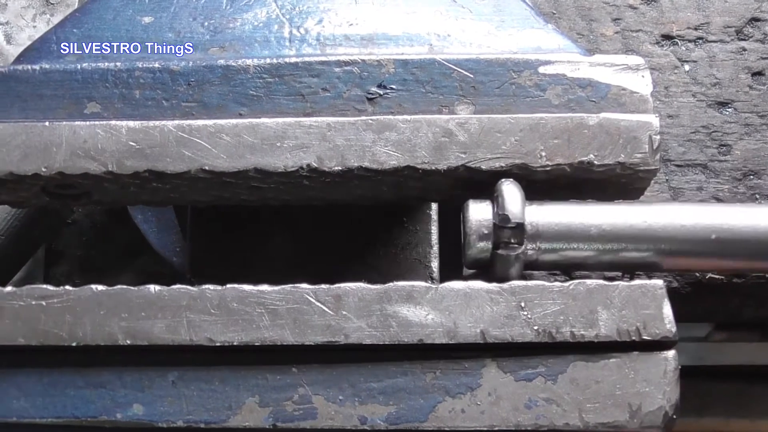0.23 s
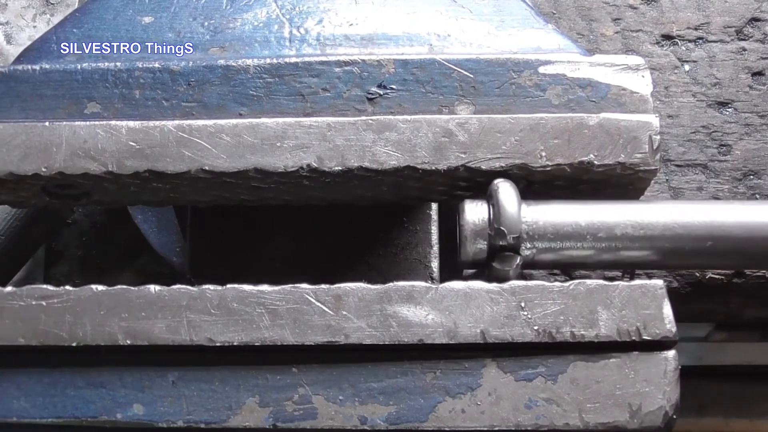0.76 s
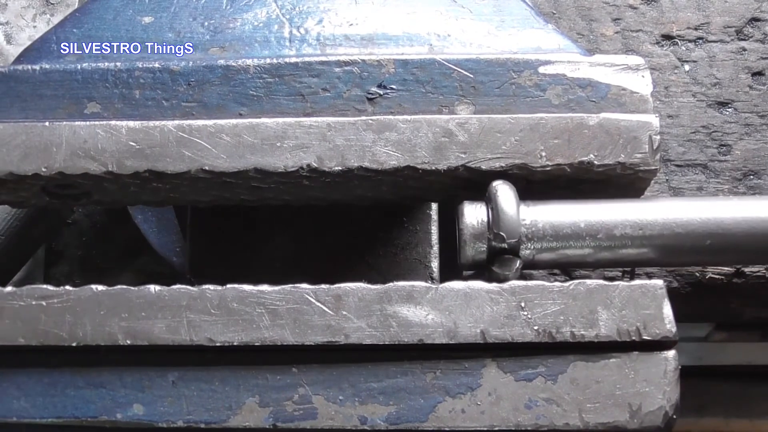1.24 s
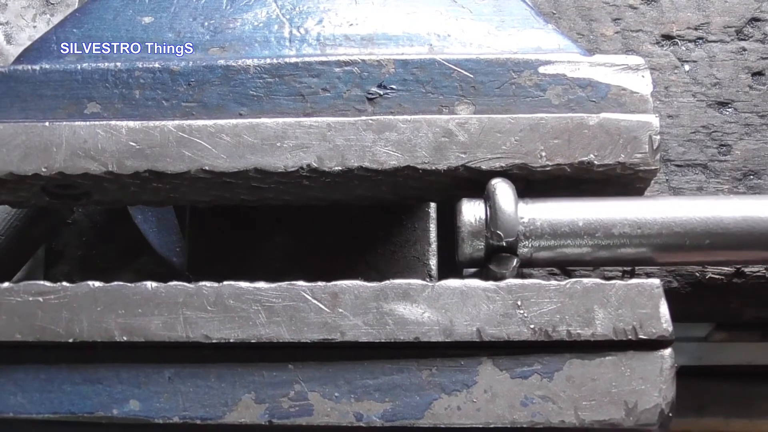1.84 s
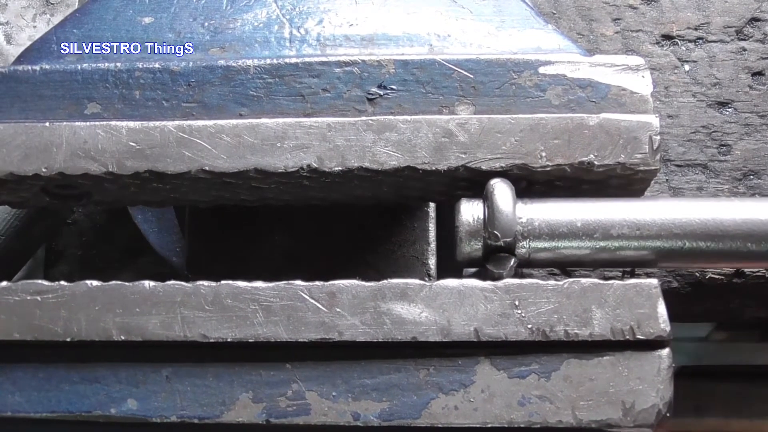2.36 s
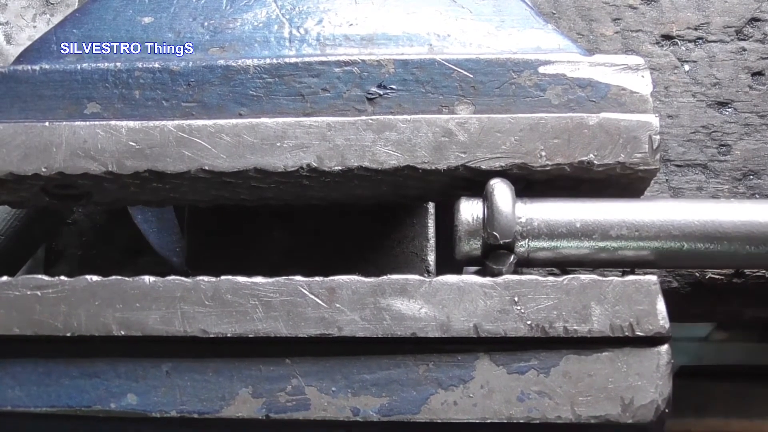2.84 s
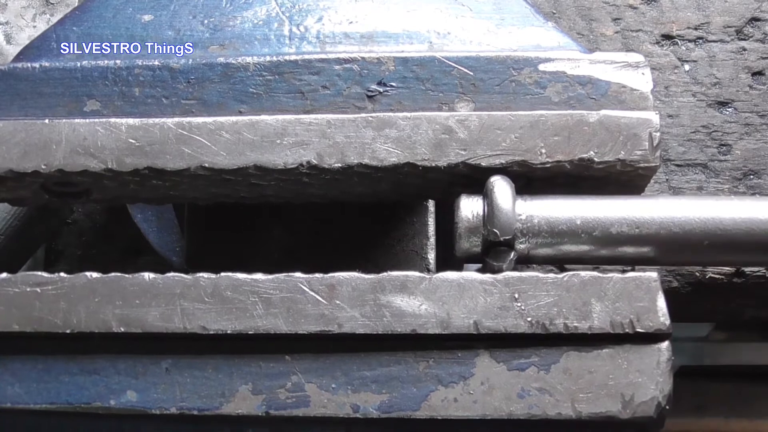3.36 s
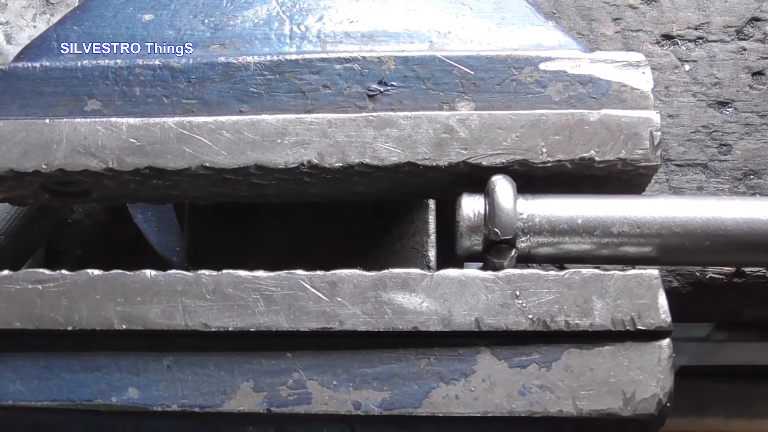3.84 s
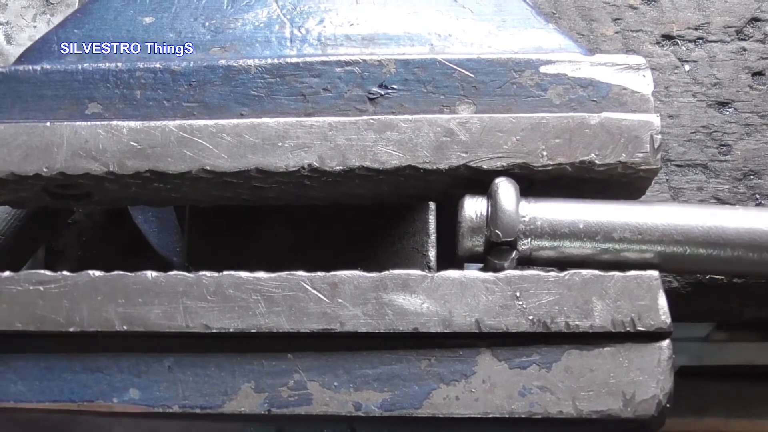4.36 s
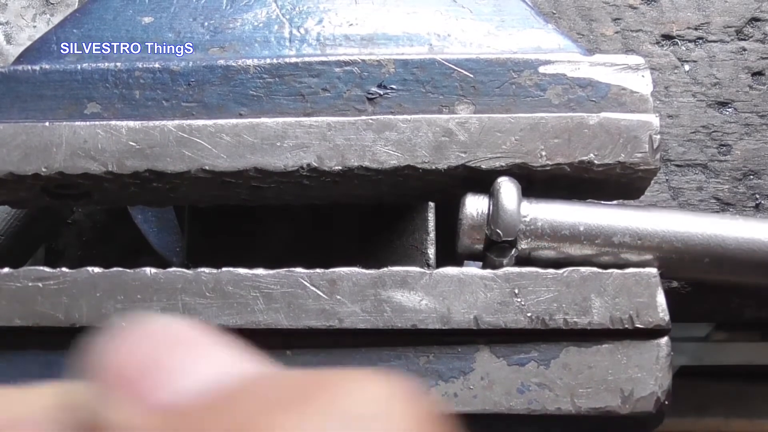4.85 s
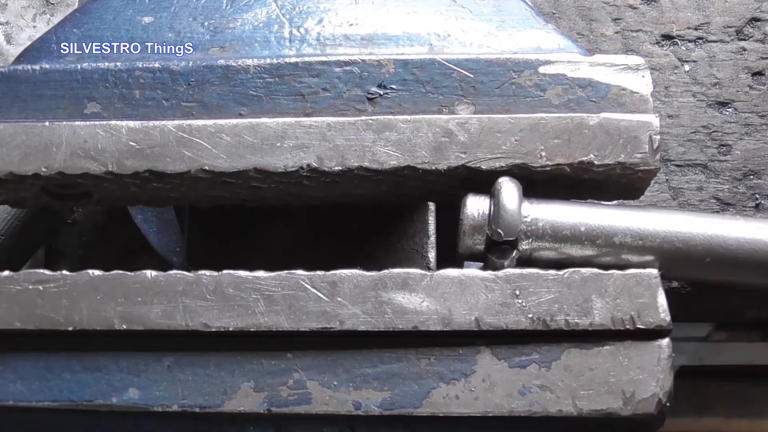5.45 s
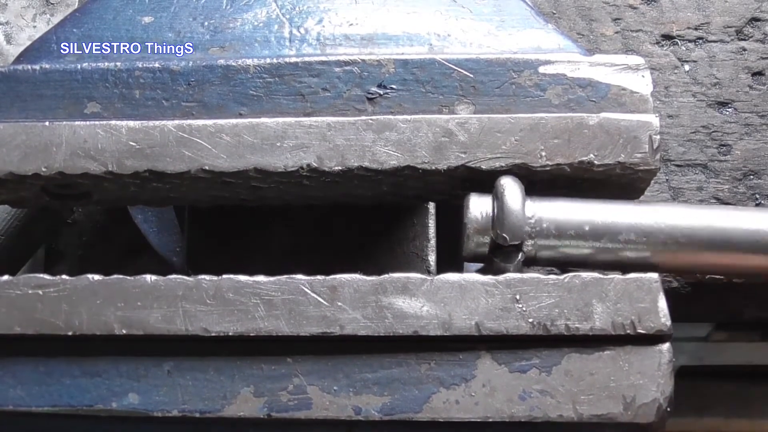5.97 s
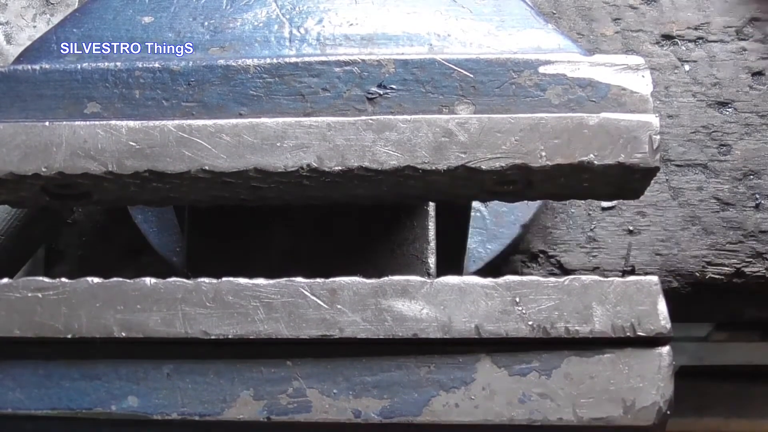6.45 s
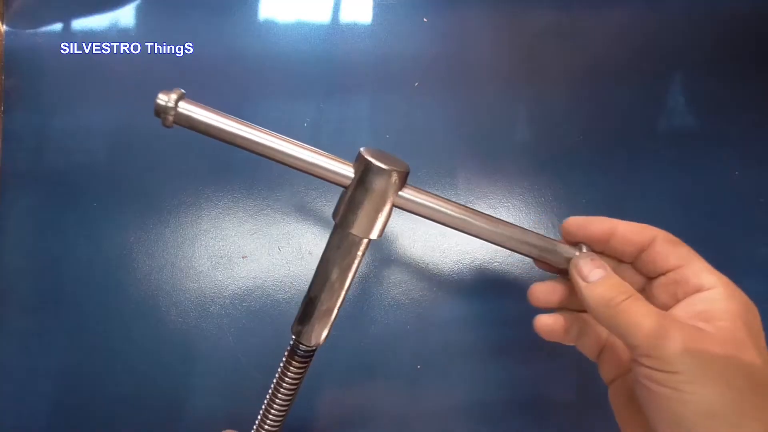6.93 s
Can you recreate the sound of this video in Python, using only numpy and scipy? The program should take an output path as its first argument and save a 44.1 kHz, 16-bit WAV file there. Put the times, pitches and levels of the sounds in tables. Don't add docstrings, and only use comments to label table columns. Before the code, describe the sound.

Stereo close microphone, short dry room answer, faint hiss and low bench rumble. Steel clinks and hollow casting thuds open the scene, followed by soft grinding and hand rustle. Hard double clacks ring the jaws, then a lull with small ticks. Later blows grow heavy, the bar rings brightly and scrapes free. After an abrupt silent gap, a handle ticks lightly over airy low room noise, with a brief slide and faint high skin squeaks.

```python
import sys
import numpy as np
from scipy import signal
from scipy.fft import rfft, irfft, next_fast_len
from scipy.io import wavfile
from scipy.ndimage import map_coordinates

SR = 44100
rng = np.random.default_rng(int(sys.argv[2]) if len(sys.argv) > 2 else 0)


def master(y):
    cut = np.clip(np.atleast_2d(y).T, -1, 1)
    pcm = np.round(cut * 32767)
    wavfile.write(sys.argv[1], SR, pcm.astype(np.int16))


def ratio_of_db(decibels):
    return 10 ** (np.asarray(decibels, float) / 20)


N = 317520

# (start [s], end [s], fade-out [s])
SHOTS = [
    (0, 6.499, .0005),
    (6.692, 6.709, .014),
    (6.737, 7.3, .0005),
]
FIRST_SHOT_END_S = 6.6
TOP_HZ, FRICTION_TOP_HZ = 16500, 15750

# (frequency [Hz], left over right [dB])
PORT_LIKENESS = [(60, .7), (180, .9), (550, .87), (1650, .75), (5000, .6), (15000, .4)]
PORT_BALANCE = [(60, -0.5), (180, -2), (550, -4), (1650, -3.5), (4970, -1.5), (15000, -1.5)]
# (frequency [Hz], level [dB])
BAR_SHADE = [(7500, -5.5), (11000, -15)]
# (frequency [Hz], time to fall 60 dB [s])
ROOM_DECAY = [(150, 0.53), (1000, 0.17), (5000, 0.28), (12000, 0.0094)]

# (time [s], level [dB])
BENCH_HUM = [
    [(2.0, -85), (2.03, -53), (2.18, -49.5), (2.22, -90)],
    [(3.35, -39), (3.6, -61), (4.6, -64.5), (4.68, -62.5)],
]

# (frequency [Hz], density [dB per Hz])
HISS_COLOR = [(1000, -43), (1700, -22), (2890, -11), (3080, -9), (3930, -3.5), (6020, -9.5), (8820, 0),
              (15700, -4)]
HISS_DB = -70.5

# (start [s], hold [s], level [dB])
JOLTS = [
    (0, 6.2, -60),
    (1.3, 1, -59),
    (3.36, 0.026, -47),
    (3.5, 0.71, -70),
    (4.62, 0.026, -61.5),
    (4.92, 0.091, -55.5),
    (5.65, 0.17, -48.5),
]
JOLT_RISE, JOLT_FALL = 150, 65
# (frequency [Hz], density [dB per Hz])
RUMBLE_COLOR = [(13, -47.5), (22, -33), (38, -11.5), (91, -6), (151, 0), (181, -2), (211, 5), (246, -5),
                (300, -3.5), (390, -3.5), (660, -120)]

# (start [s], hold [s], level [dB], scrape note [Hz])
PUSHES = [(.328, .1, -45, 649), (.43, 0.2, -43, 640), (.52, 0.039, -45.5, 440), (.66, 0.065, -49.5, 478),
          (.9, 0.25, -61.5, 514), (1.24, 0.65, -48, 464), (2.1, 0.16, -51, 552), (2.33, 0.75, -46, 640),
          (2.47, 0.086, -41, 663), (2.6, 0.16, -40.5, 660), (2.86, 0.1, -35.5, 696),
          (3.26, 0.25, -49.5, 505), (3.98, 0.22, -53.5, 590), (4.6, 0.14, -53, 530),
          (4.9, 0.13, -51.5, 526), (5.12, 0.25, -47.5, 471), (5.3, 0.25, -44, 454),
          (5.68, 0.16, -40.5, 687), (5.96, 0.39, -49.5, 600), (6.13, 0.17, -46.5, 501),
          (6.27, 0.059, -37.5, 726), (6.36, 0.22, -34.5, 569)]
PUSH_RISE, PUSH_FALL, PUSH_REST_DB = 160., 100., -63.
# (frequency [Hz], density [dB per Hz])
DRAG_COLOR = [(130, -29), (220, -10), (711, -10), (915, -11), (1020, -14), (1450, -15), (1750, -27.5),
              (1900, -25.5), (2470, -30), (4180, -120)]
SCRAPE_STEPS = [330, 450, 620, 850, 1100]

# (start [s], hold [s], rustle [dB], grind over rustle [dB])
RUBS = [(.326, 0.21, -63.5, 3), (.53, 0.047, -52, 9.5), (.66, 0.18, -67, 0.5), (1.12, 0.21, -62, -1.5),
        (1.53, 0.19, -64, -2.5), (1.78, 0.12, -58, -6), (2.1, 0.078, -53.5, -1), (2.25, 0.047, -48.5, -4.5),
        (2.45, 0.1, -53.5, 3), (2.56, 0.21, -55, 6), (2.88, 0.16, -54.5, 10), (3.04, 0.088, -54.5, -15),
        (3.2, 0.32, -56, 4), (3.62, 0.71, -69, 1), (4.46, 0.054, -67, -2), (4.64, 0.063, -77.5, 14.5),
        (4.93, 0.17, -62, -1), (5.23, 0.038, -55.5, -4), (5.33, 0.16, -51, -5), (5.55, 0.41, -55.5, -5.5),
        (5.9, 0.028, -50, -1), (6.08, 0.21, -55.5, -2), (6.28, 0.026, -49, 5.5), (6.39, 0.078, -53.5, 11.5)]
RUB_RISE, RUB_FALL, RUB_REST_DB = 165, 131, -85
FIRST_CATCH_RISE = 1500.
# (frequency [Hz], density [dB per Hz])
GRIND_COLOR = [(880, 0), (1500, 9), (1770, -8.5), (1980, 2), (2790, -3.5), (3150, -1), (3640, -2.5),
               (4310, -1), (6000, -16.5), (7800, -38), (13200, -120)]
RUSTLE_COLOR = [(2940, -5), (5000, -3.5), (8050, 1), (10900, -6.5), (13500, -7.5), (15800, -49.5)]

# (time [s], peak [dB])
RATTLE = [(6.6933, -41.5), (6.8503, -48), (6.8733, -46.5), (6.887, -50), (6.896, -40.5), (6.9136, -51),
          (6.9235, -44.5), (6.939, -41), (6.9479, -41), (6.961, -48), (6.984, -44.5), (6.999, -48),
          (7.1944, -50.5)]
# (frequency [Hz], width [Hz], level [dB])
HANDLE_MODES = [(635, 60, 0), (1230, 36, -1), (1890, 40, 0), (2550, 34, -3), (3250, 13, 2), (5830, 80, 0),
                (9170, 70, -1), (10500, 30, -7), (12500, 64, -12), (14500, 61, -20)]
# (start [s], hold [s], level [dB])
HANDLE_SLIP = [
    (6.85, 0.14, -60),
]
# (time [s], room air [dB], hand rub [dB])
QUIET_SHOT = [(6.68, -45, -58), (6.74, -47, -68), (6.8, -49, -65), (6.86, -48.5, -65), (6.95, -45.5, -62),
              (7.03, -53.5, -71), (7.2, -53, -104)]
# (frequency [Hz], density [dB per Hz])
AIR_COLOR = [(15, -27.5), (25, -6), (654, 4), (881, -10), (1430, -6.5), (2330, -12.5), (3220, -14.5),
             (11700, -14), (15800, -24)]
HAND_RUB_COLOR = [(1500, -30), (3600, -3), (4600, 0), (6000, -12), (12000, -14), (16000, -30)]
# (time [s], pitch [Hz], level [dB])
SQUEAKS = [
    [(6.74, 13500, -72), (6.81, 14200, -74), (6.85, 12600, -76)],
    [(6.81, 12000, -74), (6.835, 11400, -74), (6.87, 10600, -78)],
]

# (frequency [Hz], width [Hz], level [dB])
CASTING = [(152, 20, -6), (224, 25, -6), (291, 30, -5), (350, 30, -1), (432, 18, 4), (525, 30, -4),
           (605, 30, -5), (750, 18, 3), (890, 50, -8), (996, 50, -7), (1215, 60, -9), (1420, 45, -9)]
JAWS = [(2000, 90, -2), (2240, 90, -3), (2570, 150, -4), (2900, 100, -3), (3170, 130, 0), (3500, 120, -4),
        (3780, 90, -1), (4100, 120, -4), (4400, 70, 0), (4700, 90, -1), (5100, 130, -4), (5550, 150, -2),
        (6290, 120, -4), (6800, 200, -5)]
CHEEK = (1560, 300, -12)

# (start [s], hold [s], level [dB])
CASTING_LINGER = [
    (.575, .03, -46),
    (3.2, 0.068, -48.5),
    (3.39, 0.085, -45),
    (5.66, 0.038, -45.5),
    (5.81, 0.054, -49.5),
]
JAW_LINGER = [
    (.36, .14, -67),
    (.575, .06, -61.5),
    (3.2, .03, -56.5),
    (3.38, .12, -54),
    (5.125, .02, -67),
    (6.44, .06, -62.5),
]
# (frequency [Hz], width [Hz], level [dB])
CASTING_LINGER_MODES = [(290, 70, -5), (440, 70, 0), (757, 60, -3), (985, 80, -5), (1420, 70, -8)]
JAW_LINGER_MODES = [(2300, 300, -4), (3200, 150, -2), (3850, 160, 0), (4230, 110, 0), (4750, 170, -2)]
LINGER_RISE, CASTING_LINGER_FALL, JAW_LINGER_FALL = 900., 55., 107

# (time [s], peak [dB], note [Hz], swell [ms], time to fall 60 dB [ms])
NOTES = [(0.5324, -25.5, 3810, 2.7, 30), (.543, -30, 432, 4, 80), (.559, -18, 413, 3.3, 67),
         (.57, -37, 281.7, 8.3, 200), (.6, -38.5, 402, 12, 220), (.822, -56, 2880, 8, 60),
         (0.837, -40.5, 2890, 1.3, 20), (.842, -54, 3230, 1.7, 34), (3.274, -41, 3170, 3, 40),
         (3.36, -38, 228, 8.2, 490), (4.377, -40.5, 469, 7.3, 37), (4.915, -47, 132, 7.2, 220),
         (5.637, -13, 748, 7.1, 44), (5.637, -20, 372, 11, 43), (5.789, -23, 756, 4.4, 50),
         (5.793, -27.5, 410, 4.7, 77), (5.79, -25.5, 1017, 4, 42), (5.964, -30, 3790, 1.5, 22),
         (6.301, -26.5, 2875, 2.8, 28), (6.31, -28.5, 2000, 2.6, 50), (5.945, -28.5, 1160, 1.6, 29),
         (6.404, -40, 4750, 3, 40)]
# (time [s], peak [dB], lowest [Hz], highest [Hz])
TAPS = [(.3225, -50, 398, 2500), (1.724, -59, 400, 1500), (1.755, -48, 350, 1490), (3.957, -41, 150, 1480),
        (4.666, -45, 100, 3520), (4.8935, -45, 300, 1500), (6.2137, -34, 500, 2000),
        (6.2855, -21, 501, 1597), (6.694, -48, 249.6, 700)]

# (time [s], peak
# [dB], main note [Hz], second note [Hz], contact decay [ms])
THUDS = [(0.322, -48, 520, 1000, 250), (0.411, -38, 596, 740, 58), (0.434, -28, 1010, 1356, 25),
         (0.538, -17, 697, 1060, 8.7), (0.547, -29.5, 427, 513, 20), (0.56, -18, 410, 570, 25),
         (0.648, -31.5, 400, 1020, 110), (0.767, -37, 380, 416, 110), (0.83, -31.5, 768, 1250, 180),
         (1.344, -29, 420, 1055, 47), (1.725, -37.5, 450, 605, 23), (1.756, -31, 354, 463, 18),
         (1.852, -32.5, 1194, 604, 140), (2.015, -34.5, 1180, 367, 22), (3.173, -20, 436, 980, 36),
         (3.182, -22.5, 750, 1410, 16), (3.19, -16.5, 443, 753, 28), (3.277, -25, 1156, 790, 86),
         (3.341, -23, 625, 1424, 110), (3.35, -20.5, 1074, 740, 120), (3.359, -20, 427, 1374, 44),
         (3.954, -42, 830, 476, 4.9), (4.376, -41.5, 437, 520, 11), (4.384, -38, 450, 576, 6.4),
         (4.893, -23, 584, 932, 26), (4.905, -22, 503, 904, 22), (4.915, -22, 750, 434, 53),
         (4.932, -26, 278, 620, 130), (4.995, -28, 256, 580, 110), (5.598, -34, 520, 1020, 88),
         (5.636, -19.5, 1020, 1500, 7.9), (5.787, -12.5, 847, 1220, 18), (5.795, -26, 404, 707, 32),
         (5.944, -22, 1215, 930, 35), (6.195, -25, 388, 685, 33), (6.213, -26, 980, 510, 47),
         (6.262, -19.5, 760, 405, 90), (6.284, -18, 700, 1506, 17), (6.307, -12.5, 972, 1508, 48),
         (6.313, -25, 408, 692, 41),
         (4.659, -38, 250, 1125, 15),
    (4.68, -38, 668, 496, 26),
    (6.325, -31.5, 417, 693, 14),
    (6.362, -24, 1020, 440, 30),
    (6.402, -20.5, 418, 560, 124),
    (6.47, -27.5, 1213, 610, 64),
]
GRIP_HZ, NOTE_HZ = 22, 55

# (time [s], jaw [dB], snap [dB], jaw note [Hz], contact decay [ms])
CLINKS = [(0.5296, -25, -28.5, 3450, 4.9), (0.5315, -18, -25, 3750, 39), (0.5586, -26.5, -48, 2100, 4.7),
          (0.5639, -24.5, -37.5, 4640, 16), (0.827, -54, -63, 2910, 27), (0.835, -45, -50, 3000, 23),
          (0.843, -56, -60, 3200, 25), (1.853, -41, -59, 3800, 21), (2.9942, -37.5, -37, 3360, 63),
          (3.0875, -38.5, -34, 3580, 34), (3.1718, -23.5, -39, 3200, 41), (3.1839, -12.5, -25.5, 4300, 58),
          (3.2754, -37.5, -58.5, 3200, 35), (3.3394, -13, -30.5, 4560, 46),
          (3.3596, -10.5, -13.5, 3134, 14), (5.7875, -19, -26.5, 7820, 73),
          (5.9477, -31.5, -49.5, 2016, 17), (5.9641, -22.5, -14, 3790, 7.3), (6.2125, -37, -68.5, 1780, 29),
          (6.261, -34.5, -51.5, 1930, 35), (6.2813, -27.5, -36, 5800, 22), (6.305, -20, -45.5, 2800, 24),
          (6.3099, -19.5, -32.5, 1850, 40), (6.313, -19.5, -31.5, 2910, 25), (6.4, -37, -57, 3790, 30.4),
          (6.4044, -35.5, -49, 3790, 39.6)]
# (time [s], snap [dB])
TICKS = [
    (2.4422, -52.5),
    (3.957, -65),
    (4.097, -35),
    (4.2657, -44),
    (5.716, -41.5),
]
TICK_JAW_DB, TICK_HZ, TICK_MS = -20, 4090, 5.6
# (frequency [Hz], density [dB])
SNAP_COLOR = [(2000, -36), (5000, 0.5), (8500, 11.5), (12000, -1), (16000, -21.5)]
SNAP_DB = 3.5

# (frequency [Hz], quick decay [s], lasting decay [s], lasting share [dB]); decays to
# -60 dB
BAR_MODES = [(3830, .035, 1.5, -15), (7225, .05, .48, -26), (11160, .05, .4, -25), (11600, .05, .4, -25)]
# (time [s], then the peak of each bending mode [dB])
RINGS = [
    (0.531, -62, -21, -27, -21),
    (.535, -62, -38, -27.5, -19),
    (0.562, -81, -28.5, -82, -54.5),
    (1.30, -65, -65, -63, -54),
    (1.589, -63, -51.5, -63, -55),
    (3.183, -50, -31, -46.5, -36),
    (3.357, -60.5, -37.5, -48, -29),
    (5.9644, -42.5, -16.5, -17.5, -19),
]
PAIR_HZ = 15
# (start [s], hold [s], second mode [dB], first over it [dB], upper pair over it [dB])
SLIDES = [
    (.47, 0.062, -55, -14, -1),
    (5.925, 0.016, -61.5, -12, -2),
    (6.43, 0.09, -47.5, -7.5, 1),
]
SLIDE_RISE, SLIDE_FALL = 164, 1100


def unit(x):
    return x / np.sqrt(np.mean(np.abs(x) ** 2) + 1e-20)


def along(points, hz):
    f, v = np.transpose(points)
    return np.interp(np.log(hz + 1), np.log(f + 1), v)


def curves(rows):
    s, *cols = np.transpose(rows)
    return [np.interp(np.arange(N) / SR, s, c, left=-140, right=-140) for c in cols]


def strokes(rows, rise, fall, rest_db=-140.):
    t = np.arange(N // 64 + 2) * 64 / SR
    start, hold, db, *traits = np.transpose(rows)[..., None]
    before = np.clip(start - t, 0, None)
    after = np.clip(t - start - hold, 0, None)
    power = ratio_of_db(db - rise * before - fall * after) ** 2 + 1e-30
    total = power.sum(0)
    slow = [10 * np.log10(total + ratio_of_db(rest_db) ** 2)]
    slow += [(power * trait).sum(0) / total for trait in traits]
    return [np.interp(np.arange(N) / SR, t, c) for c in slow]


def first_catches(rows, rise):
    return np.where(np.arange(len(rows)) == 0, FIRST_CATCH_RISE, rise)[:, None]


def wobble(rate, size=N):
    knots = rng.standard_normal(int(size * rate / SR) + 4)
    return map_coordinates(knots, [np.arange(size) * rate / SR])


def filtered(x, response):
    m = next_fast_len(x.shape[-1] + SR // 4)
    shape = unit(response(np.fft.rfftfreq(m, 1 / SR)))
    return irfft(rfft(x, m) * shape, m)[..., :x.shape[-1]]


def low_pass(hz, corner_hz):
    return 1 / (1 + 1j * hz / corner_hz - (hz / corner_hz) ** 2) ** 2


def high_pass(hz, corner_hz):
    return low_pass(-corner_hz ** 2 / (hz + 1), corner_hz)


def resonant(modes):
    def response(f):
        return sum((-1) ** k * ratio_of_db(db) * 1j * f * w / (c * c - f * f + 1j * f * w)
                   for k, (c, w, db) in enumerate(modes))
    return response


def varied(modes, spread_db):
    return [(c, w, db + spread_db * rng.standard_normal()) for c, w, db in modes]


def contact(t60, rise=0.00053):
    t = np.arange(SR // 4) / SR
    return rng.standard_normal(len(t)) * ratio_of_db(-60 * t / max(t60, .003)) * (1 - np.exp(-t / rise))


def add(track, s, db, sound):
    track[..., round(s * SR):][..., :sound.shape[-1]] += ratio_of_db(db) * sound / np.abs(sound).max()


def rush(spectrum, grain_db, grains):
    pair = rng.standard_normal((2, N)) * ratio_of_db(grain_db * wobble(grains))

    def share(hz):
        turn = np.arccos(np.clip(along(PORT_LIKENESS, hz), -1, 1)) / 2
        return ratio_of_db(along(spectrum, hz)) * (hz < FRICTION_TOP_HZ) * [np.cos(turn), np.sin(turn)]

    mid, side = filtered(pair, share)
    ports = np.array([mid + side, mid - side])
    return unit(filtered(ports, lambda hz: ratio_of_db(along(PORT_BALANCE, hz) * [[.5], [-.5]])))


def shop(x):
    hz, t, z = signal.stft(rng.standard_normal((2, SR // 2)), SR, nperseg=256)
    mid, side = signal.istft(z * ratio_of_db(-60 * t / along(ROOM_DECAY, hz)[:, None]), SR, nperseg=256)[1]
    tail = np.array([mid + 0.25 * side, mid - 0.59 * side]) / np.linalg.norm(mid)
    delayed = np.pad(x, (250, 0))
    return signal.fftconvolve(delayed[None], tail, axes=1)[:, :N]


def hum():
    once = resonant([(152.83, 4.7, 0)])
    level = sum(ratio_of_db(curves(rows)[0]) for rows in BENCH_HUM)
    return level * filtered(rng.standard_normal(N), lambda f: once(f) ** 2)


def casting_scrape(scrape_hz):
    rough = rush(DRAG_COLOR, grain_db=0.3, grains=130.0)
    step = np.interp(scrape_hz, SCRAPE_STEPS, np.arange(len(SCRAPE_STEPS)))
    moving = 0
    for k, hz in enumerate(SCRAPE_STEPS):
        nearness = np.clip(1 - abs(step - k), 0, 1)
        moving = moving + nearness * unit(filtered(rough, resonant([(hz, 0.36 * hz, 0)])))
    ringing = unit(filtered(rough, resonant(CASTING)))
    return unit(1.26 * rough + 2.8 * moving + 0.14 * ringing)


def jaw_grind():
    grind = rush(GRIND_COLOR, grain_db=2.4, grains=200.)
    return unit(grind + 0.067 * unit(filtered(grind, resonant(JAWS))))


def drag():
    rumble_db, = strokes(JOLTS, JOLT_RISE, JOLT_FALL)
    casting_db, scrape_hz = strokes(PUSHES, first_catches(PUSHES, PUSH_RISE), PUSH_FALL, PUSH_REST_DB)
    rustle_db, grind_over_db = strokes(RUBS, first_catches(RUBS, RUB_RISE), RUB_FALL, RUB_REST_DB)
    push = wobble(22)
    out = ratio_of_db(HISS_DB) * rush(HISS_COLOR, grain_db=-1.0, grains=490.0)
    out += ratio_of_db(rumble_db + 1.5 * wobble(9.6)) * rush(RUMBLE_COLOR, grain_db=0.5, grains=37.0)
    out += ratio_of_db(casting_db + .9 * push) * casting_scrape(scrape_hz)
    out += ratio_of_db(rustle_db + grind_over_db + 1.1 * push) * jaw_grind()
    out += ratio_of_db(rustle_db + 1.3 * wobble(22.33)) * rush(RUSTLE_COLOR, grain_db=1.0, grains=320.0)
    return (np.arange(N) < FIRST_SHOT_END_S * SR) * out


def handle():
    ticks = np.zeros(N + SR)
    for s, db in RATTLE:
        for modes in (HANDLE_MODES[:4], HANDLE_MODES[4:]):
            add(ticks, s, db, filtered(contact(.04), resonant(varied(modes, spread_db=2.))))
    room_db, rub_db = curves(QUIET_SHOT)
    out = ticks[:N] + ratio_of_db(room_db - 7.5) * rush(AIR_COLOR, grain_db=1.0, grains=26.0)
    out += ratio_of_db(rub_db) * rush(HAND_RUB_COLOR, grain_db=2., grains=150.)
    for rows in SQUEAKS:
        hz, db = curves(rows)
        phase = 2 * np.pi * np.cumsum(hz + 60 * wobble(200)) / SR
        out += ratio_of_db(db + 2.77 * wobble(90)) * np.sin(phase)
    return out


def slip():
    level_db, = strokes(HANDLE_SLIP, 300., 250.)
    singing = filtered(rng.standard_normal(N), resonant(HANDLE_MODES[:4]))
    return ratio_of_db(level_db + 2.5 * wobble(40)) * singing


def linger():
    out = np.zeros((2, N))
    for rows, modes, fall in ((CASTING_LINGER, CASTING_LINGER_MODES, CASTING_LINGER_FALL),
                              (JAW_LINGER, JAW_LINGER_MODES, JAW_LINGER_FALL)):
        level_db, = strokes(rows, LINGER_RISE, fall)
        feed = ratio_of_db(level_db) * rng.standard_normal((2, N))
        mid, side = filtered(feed, lambda f: sum(abs(resonant([mode])(f)) ** 2 for mode in modes))
        out += [mid + .3 * side, mid - 0.37 * side]
    return out


def notes_and_taps():
    out, t = np.zeros((2, N + SR)), np.arange(SR // 4) / SR
    for s, db, hz, swell_ms, t60_ms in NOTES:
        pan_db = 2.1 * np.log2(min(hz, 1500) / 600)
        swell = (1 - np.exp(-1000 * t / swell_ms)) ** 2
        note = swell * ratio_of_db(-60000 * t / t60_ms) * np.sin(2 * np.pi * hz * t)
        add(out, s, db, note * ratio_of_db([[pan_db], [-pan_db]]))
    click = 1. * (np.arange(2048) == 0)
    for s, db, low_hz, high_hz in TAPS:
        add(out, s, db, filtered(click, lambda f: low_pass(f, high_hz) * high_pass(f, low_hz)))
    return out[:, :N]


def knocks():
    out = np.zeros((2, N + SR))
    for s, db, hz, second_hz, t60_ms in THUDS:
        struck = varied(CASTING + [CHEEK], spread_db=2.)
        body = resonant([(c, w + GRIP_HZ, level) for c, w, level in struck])
        notes = resonant([(hz, NOTE_HZ, 0), (second_hz, NOTE_HZ, -4.)])
        chatter = contact(t60_ms / 1000, rise=0.0023)
        chatter /= np.linalg.norm(chatter)
        push = np.arange(len(chatter)) == SR // 1000
        soft = lambda f: low_pass(f, 150 + 1.4 * max(hz, second_hz)) * high_pass(f, 185.)
        blow = filtered(push + .45 * chatter, lambda f: notes(f) * soft(f))
        blow += 0.86 * filtered(.5 * push + chatter, lambda f: body(f) * soft(f))
        pan_db = 1.86 * np.log2(hz / 560)
        add(out, s, db, blow * ratio_of_db([[pan_db], [-pan_db]]))
    return out[:, :N]


def clinks():
    out = np.zeros((2, N + SR))
    ticks = [(s, db + TICK_JAW_DB, db, TICK_HZ, TICK_MS) for s, db in TICKS]
    for s, jaw_db, snap_db, hz, t60_ms in CLINKS + ticks:
        struck = [(c, 0.81 * w, level) for c, w, level in varied([CHEEK] + JAWS, spread_db=0.7)]
        chatter = contact(t60_ms / 1000, rise=0.00063)
        chatter /= np.linalg.norm(chatter)
        push = np.arange(len(chatter)) == SR // 1000
        mid = filtered(.6 * push + chatter, resonant(struck))
        mid += .8 * filtered(push + .6 * chatter, resonant([(hz, 110., 0)]))
        side = ratio_of_db(-5.0) * filtered(chatter, resonant(varied(JAWS[::3], spread_db=3.)))
        add(out, s, jaw_db, np.array([mid + side, mid - side]))
        snap = contact(t60_ms / 1600, rise=.0001)
        snap[1] += 0.41 * np.linalg.norm(snap)
        add(out, s, snap_db + SNAP_DB, filtered(snap, lambda f: ratio_of_db(along(SNAP_COLOR, f))))
    return out[:, :N]


def bar():
    out, t = np.zeros(N + SR), np.arange(SR // 2) / SR
    for s, *levels in RINGS:
        for db, (hz, quick, lasting, lasting_db) in zip(levels, BAR_MODES):
            beat = .3 * wobble(70, size=len(t)) + np.cos(2 * np.pi * PAIR_HZ * t)
            fade = ratio_of_db(-60 * t / quick) + ratio_of_db(lasting_db - 60 * t / lasting) * beat
            onset = 1 - np.exp(-t / 0.00055)
            detuned_hz = hz * (1 + 0.001 * rng.standard_normal())
            add(out, s, db, fade * onset * np.sin(2 * np.pi * detuned_hz * t))
    sing_db, first_db, upper_db = strokes(SLIDES, SLIDE_RISE, SLIDE_FALL)
    for level_db, modes in ((sing_db + first_db, BAR_MODES[:1]), (sing_db, BAR_MODES[1:2]),
                            (sing_db + upper_db, BAR_MODES[2:])):
        once = resonant([(hz, 130., 0) for hz, *decays in modes])
        rubbing = ratio_of_db(level_db + 3.1 * wobble(100)) * rng.standard_normal(N)
        out[:N] += filtered(rubbing, lambda f: once(f) ** 2)
    return out[:N]


def scene():
    low, jaw, ring = knocks(), clinks(), bar()
    left = filtered(np.roll(ring, 1), lambda hz: ratio_of_db(along(BAR_SHADE, hz))) * ratio_of_db(1.0)
    bar_ports = np.array([left, ring * ratio_of_db(1.5)])
    answer = ratio_of_db(-12.0) * shop(low.mean(0)) + ratio_of_db(-18.0) * shop(jaw.mean(0) + ring)
    first_shot = hum() + drag() + linger() + notes_and_taps() + low + jaw + bar_ports
    return first_shot + answer + handle() + slip()


def band_limit(x):
    return signal.sosfilt(signal.butter(12, 16830, fs=SR, output="sos"), x)


def record(dry):
    t = np.arange(N) / SR
    present = sum((t >= a) * np.clip((b - t) / fade, 0, 1) for a, b, fade in SHOTS)
    limited = filtered(dry, lambda hz: (hz < TOP_HZ) * high_pass(hz, 36.0))
    limited = limited * np.sqrt(2 * TOP_HZ / SR)
    return band_limit(limited * present)


dry = scene()
out = record(dry)
master(out)
```